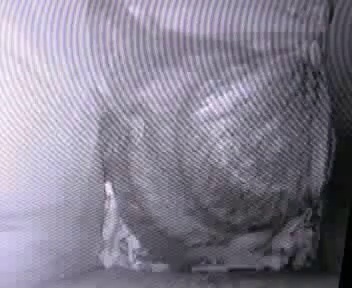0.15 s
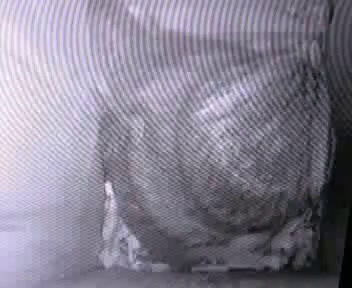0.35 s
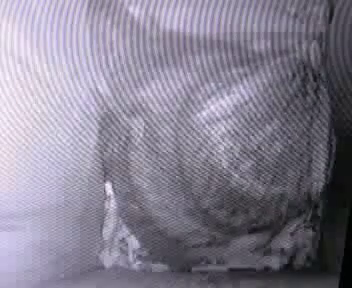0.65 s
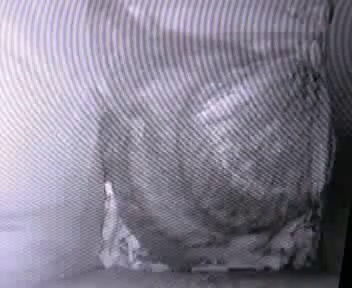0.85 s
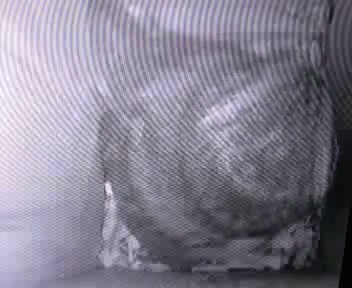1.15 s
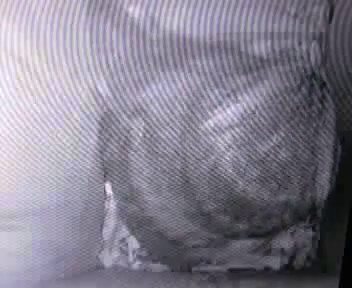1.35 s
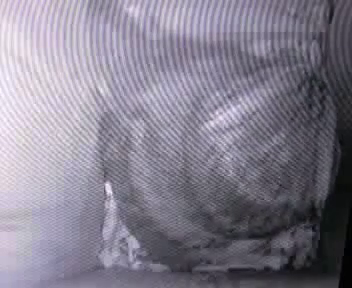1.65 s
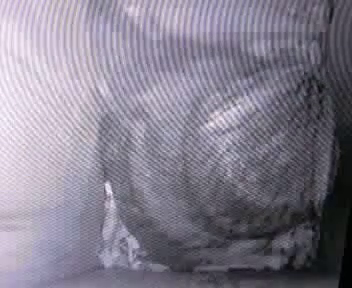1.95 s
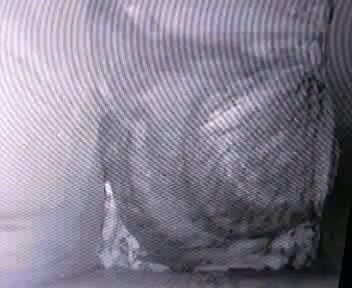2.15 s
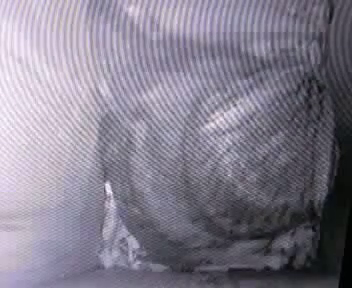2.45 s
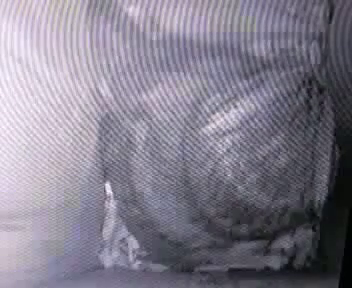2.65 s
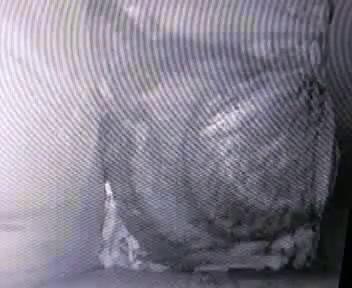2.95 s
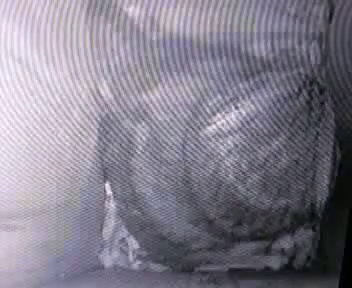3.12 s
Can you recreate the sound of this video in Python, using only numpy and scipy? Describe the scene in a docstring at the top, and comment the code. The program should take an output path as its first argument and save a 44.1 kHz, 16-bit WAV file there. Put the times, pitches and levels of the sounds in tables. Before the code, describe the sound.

A screech owl calls from a nest box: at about 0.75 seconds a soft, nearly pure whistle glides up, holds with a slight tremble, dips briefly twice and stops near 1.5. Only hollow, steady hiss, faint low mains hum and very thin high electronic whine continue until 3.2, when a second call begins rising and is cut off. Short small-room echoes colour the monitor loudspeaker sound.

```python
"""A screech owl in a nest box gives one nearly pure, arching call and begins a second.
Each call is a gliding sine with a slight tremble and a faint octave that comes and goes.
It is heard through the loudspeaker of a video monitor in a small room, built from echoes and a tail.
Under it lie steady microphone hiss made of shaped noise, and sines: mains hum, the thin
whistles of the picture circuits and one added sine close above the highest whistle."""
import sys
import numpy as np
from scipy import signal
from scipy.fft import rfft, irfft
from scipy.io import wavfile

SR = 44100
rng = np.random.default_rng(int(sys.argv[2]) if len(sys.argv) > 2 else 0)


def master(y):
    """Save y as 16-bit WAV."""
    cut = np.clip(np.atleast_2d(y).T, -1, 1)
    pcm = np.round(cut * 32767)  # scale
    wavfile.write(sys.argv[1], SR, pcm.astype(np.int16))


N = 144648
T = np.arange(N) / SR  # time of every sample, in seconds

# first call, which rises, holds and dips twice: (time [s], pitch [Hz], level before the room [dB])
FIRST_CALL = [(0.757, 660, -62), (0.768, 715, -42), (0.79, 762, -36), (0.822, 800, -33.7),
              (0.878, 869, -41.5), (0.942, 911, -37.8), (0.975, 929, -37.4), (0.987, 917, -35.9),
              (1.035, 928, -36.1), (1.1, 908, -34.9), (1.236, 913, -34.8), (1.282, 909, -32.4),
              (1.311, 890, -35.7), (1.348, 788, -43.9), (1.358, 871, -38.5), (1.398, 939, -36),
              (1.438, 916, -32.9), (1.462, 869, -38.7), (1.472, 793, -41.1), (1.495, 814, -65)]
# rise of the second call: (time [s], pitch [Hz], level before the room [dB])
SECOND_CALL = [(3.226, 671, -60), (3.241, 733, -42), (3.251, 781, -35), (3.261, 798, -35),
               (3.29, 832, -33.5)]
# the octave flares in the rise, at the top and in the dips: (time [s], level against the fundamental [dB])
OCTAVE_LEVEL = [(.79, -38), (.835, -20), (.87, -16), (.89, -21), (.93, -40), (.98, -31), (1.06, -30),
                (1.1, -42), (1.3, -36), (1.33, -12), (1.37, -24), (1.42, -42), (1.455, -29), (1.472, -16),
                (3.26, -32), (3.275, -18)]
# reflection inside the nest box: (delay [ms], gain [factor])
BOX_REFLECTION = [(2.97, -.32)]
# reflections from the room walls: (delay [ms], gain [factor])
WALL_ECHOES = [(9.84, -.25), (13.43, .37), (26.19, -.16), (33.64, .16), (39.76, -.13), (50, .09),
               (54.5, .04), (61.32, .04), (77.79, -.04)]
# tone colour of the microphone hiss: (frequency [Hz], relative level [dB])
HISS_COLOUR = [(20, -13), (55, -6), (110, 0.5), (230, -1), (330, 4), (450, -2), (1000, -2.5), (2000, -1.5),
               (4500, -5), (6500, -3.5), (8100, -4), (8900, -6), (10300, -12), (12000, -8), (13400, -10),
               (14500, -21), (15600, -30)]
# resonances that colour the hiss: (centre [Hz], width at half the dB height [Hz], height [dB])
HISS_RESONANCES = [(1673, 104, 4), (2480, 122, 5.5), (3158, 440, 5), (3885, 385, 6.5), (4433, 230, 6.5),
                   (5110, 320, 8), (5864, 300, 7.5), (6550, 370, 7), (7020, 120, 6.5), (7430, 400, 5.5),
                   (8000, 370, 2.5), (7890, 300, 2.5), (8830, 170, 2.5)]
# left-right likeness of the hiss before the room: (frequency [Hz], coherence [-1 to 1])
HISS_LIKENESS = [(60, 0.8), (300, 0.79), (1400, .75), (3000, 0.69), (6000, 0.62), (8500, 0.17),
                 (14000, -0.15)]
# lean of the hiss before the room: (frequency [Hz], left minus right [dB])
HISS_LEAN = [(100, -0.5), (1500, -0.5), (3200, -2), (6000, 0), (9300, -6), (10700, 3), (12000, 3),
             (15000, 3)]
# share of the hiss that comes by way of the room: (frequency [Hz], share [0 to 1])
HISS_ROOM_SHARE = [(200, 0.3), (2000, 0.69), (7500, 0.55), (10000, 0.4)]
# steady mains hum: (multiple of the mains frequency [count], level [dB])
STEADY_HUM = [(3, -73), (4, -70), (5, -69), (8, -76), (9, -72), (10, -68), (11, -73.5), (17, -76.5),
              (19, -69.5), (22, -74.5), (24, -74), (29, -71)]
# two drifting hum harmonics: (time [s], second harmonic [dB], sixth harmonic [dB])
DRIFTING_HUM = [(0, -65, -71), (.3, -61, -63), (.7, -65, -78), (1.5, -61, -63.5), (2.0, -66.5, -62),
                (2.7, -67.5, -63.5), (3.0, -74, -71)]
# whistles of the picture circuits; the last is an added sine close above the line whistle: (frequency [Hz])
WHISTLE_PITCH = [7852, 7882, 7912, 8220, 8250, 8280, 15734.3, 15747.3]
# levels of those sines, in the same order: (left [dB], right [dB])
WHISTLE_LEVEL = [(-63, -62.5), (-63, -63), (-73, -70), (-79, -68), (-77, -59), (-77, -63), (-62, -77),
                 (-67, -79)]

JITTER, SHIMMER_DB = 0.0019, 0.12  # rms tremble: fraction of the pitch, and dB of the level
WAVER_HZ = 69.6  # how fast the tremble moves
TAIL_DB, TAIL_T60_S = -19, 0.36  # tail strength against the direct sound; time to fall 60 dB
HISS_DB = -47.5
RUSH_HZ, RUSH_WIDTH_HZ, RUSH_DB = 823, 128, -58.5  # narrow noise on the left
MAINS_HZ = 59.95
WHISTLE_LAG_TURNS = 0.21  # part of a cycle by which the right microphone lags
EDGE_HZ = 15950  # upper limit of the recorder


def amp(db):
    """Turns decibels into gain."""
    return 10 ** (np.asarray(db) / 20)


def evened(x):
    """Scales a sound to an rms (average strength) of one."""
    return x / np.sqrt(np.mean(x ** 2) + 1e-20)


def read(points, hz):
    """Reads a table between its points, on a log-frequency axis."""
    f, value = np.transpose(points)
    return np.interp(np.log(hz + 1), np.log(f), value)


def waver(rate_hz):
    """Smooth random motion: noise that fades out above about the given rate."""
    hz = np.fft.rfftfreq(N, 1 / SR)
    slow = rfft(rng.standard_normal(N)) * np.exp(-(hz / rate_hz) ** 2)
    return evened(irfft(slow, N))


def tone(hz, lag=0):
    """A steady sine of unit rms with a random start, late by lag turns."""
    return np.sqrt(2) * np.sin(2 * np.pi * (hz * T + rng.random() - lag))


def room(x, echoes):
    """Echoes beat against a gliding tone; a faint tail, different on each side, dies away beneath them."""
    t = T[:SR // 2]
    fade = amp(-60 * t / TAIL_T60_S) * (t > .01)
    response = rng.standard_normal((2, len(t))) * fade
    response *= amp(TAIL_DB) / np.linalg.norm(response[0])
    response[:, 0] = 1  # direct sound
    for ms, gain in echoes:
        response[:, round(ms * SR / 1000)] += gain
    return signal.fftconvolve(np.atleast_2d(x), response, axes=1)[:, :N]


def mains_hum():
    """Sines at multiples of the mains frequency, in the middle; two of them drift in level."""
    hum = sum(amp(db) * tone(round(k) * MAINS_HZ) for k, db in STEADY_HUM)
    s, second_db, sixth_db = np.transpose(DRIFTING_HUM)
    for k, db in ((2, second_db), (6, sixth_db)):
        hum = hum + amp(np.interp(T, s, db)) * tone(k * MAINS_HZ)
    return hum


def picture_whistles():
    """Thin steady sines from the picture circuits, and one added, leaning to either side."""
    lag = np.array([[0], [WHISTLE_LAG_TURNS]])
    return sum(amp(db)[:, None] * tone(hz, lag) for hz, db in zip(WHISTLE_PITCH, WHISTLE_LEVEL))


def hiss():
    """Steady, hollow microphone noise, wider in the treble, with a narrow rush on the left."""
    hz = np.fft.rfftfreq(N, 1 / SR)
    first, second, third = rfft(rng.standard_normal((3, N)))
    same = np.clip(read(HISS_LIKENESS, hz), -1, 1)
    lean = read(HISS_LEAN, hz) / 2
    # the right side mixes the left side's noise with noise of its own
    left = first * amp(lean)
    right = (same * first + np.sqrt(1 - same ** 2) * second) * amp(-lean)

    resonances = sum(db * .5 ** ((2 * (hz - centre) / width) ** 2)
                     for centre, width, db in HISS_RESONANCES)
    pair = np.array([left, right]) * amp(read(HISS_COLOUR, hz) + resonances)
    share = np.clip(read(HISS_ROOM_SHARE, hz), 0, 1)
    by_room = room(irfft(pair * share, N), WALL_ECHOES)
    straight = irfft(pair * (1 - share), N)
    wide = evened(by_room + straight)

    rush = evened(irfft(third / (1 + (2 * (hz - RUSH_HZ) / RUSH_WIDTH_HZ) ** 2), N))
    return amp(HISS_DB) * wide + amp(RUSH_DB) * np.array([rush, np.zeros(N)])


def owl(curve):
    """An almost pure whistle with a slight tremble and a faint octave that comes and goes."""
    s, pitch, db = np.transpose(curve)
    hz = np.interp(T, s, pitch) * (1 + JITTER * waver(WAVER_HZ))
    level = amp(np.interp(T, s, db) + SHIMMER_DB * waver(WAVER_HZ))
    level = level * (T > s[0]) * (T < s[-1])  # silent outside the call
    phase = 2 * np.pi * np.cumsum(hz) / SR
    octave = amp(np.interp(T, *np.transpose(OCTAVE_LEVEL)))
    return np.sqrt(2) * level * (np.sin(phase) + octave * np.sin(2 * phase))


def scene():
    """Both calls in the box and room, a touch stronger on the right, over hiss, hum and whistles."""
    calls = room(owl(FIRST_CALL) + owl(SECOND_CALL), BOX_REFLECTION + WALL_ECHOES)
    calls = calls * amp([[-.2], [.2]])  # left, right
    return calls + hiss() + mains_hum() + picture_whistles()


def record(dry):
    """The recorder's band limit: a steep filter removes what lies above its edge."""
    lowpass = signal.firwin(1023, EDGE_HZ, window=("kaiser", 9), fs=SR)
    return signal.oaconvolve(dry, lowpass[None], "same")


dry = scene()
out = record(dry)
master(out)
```